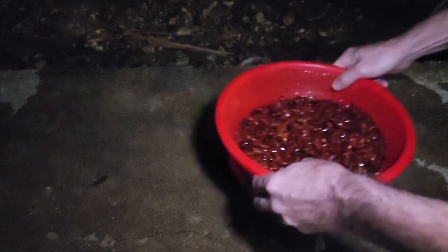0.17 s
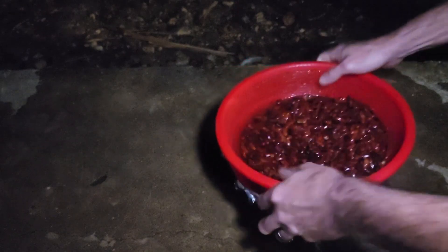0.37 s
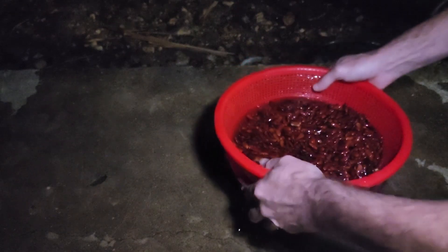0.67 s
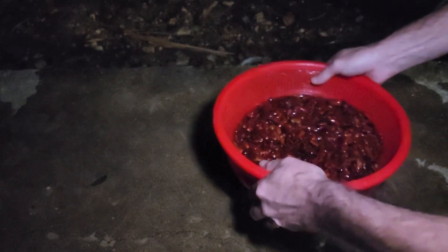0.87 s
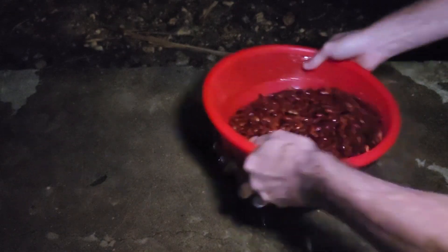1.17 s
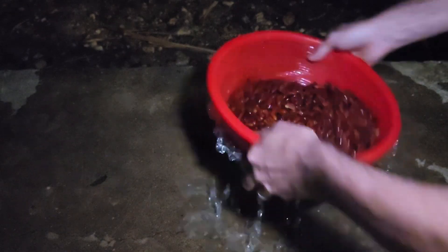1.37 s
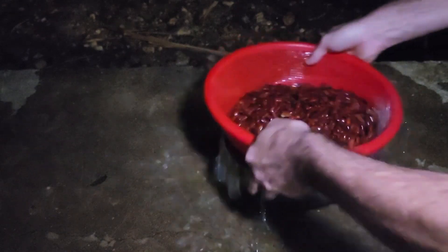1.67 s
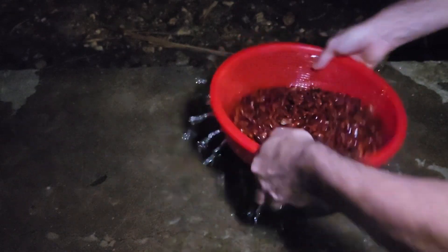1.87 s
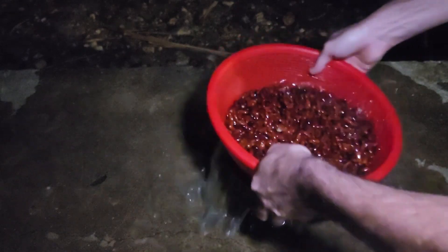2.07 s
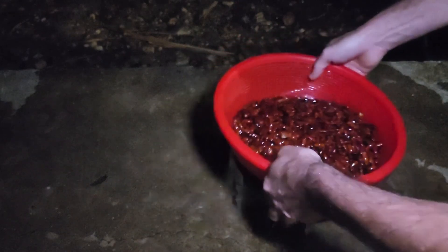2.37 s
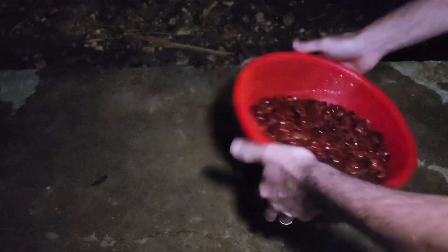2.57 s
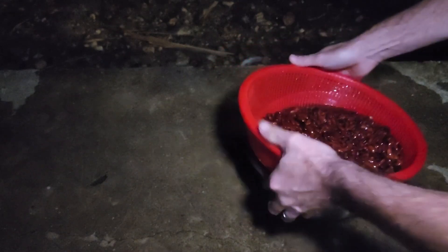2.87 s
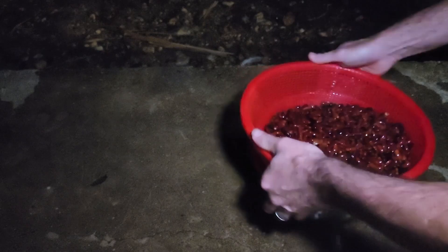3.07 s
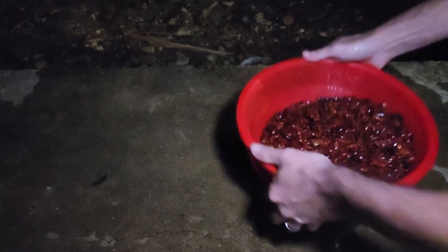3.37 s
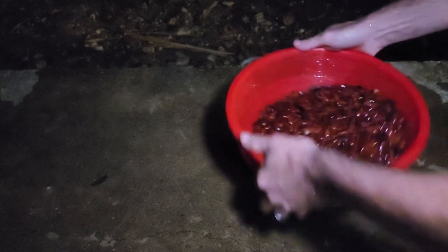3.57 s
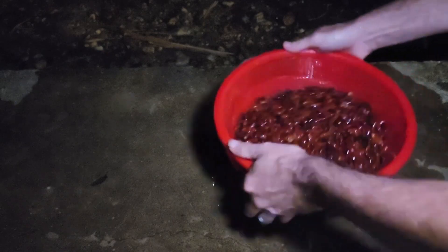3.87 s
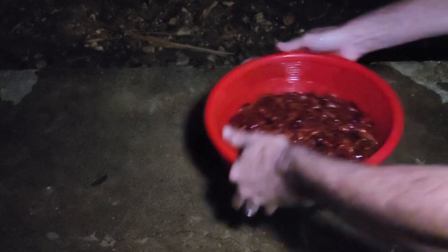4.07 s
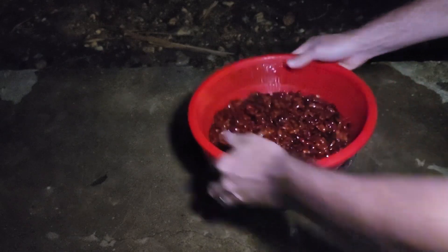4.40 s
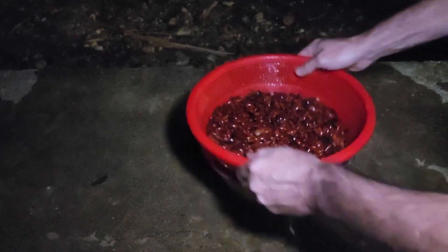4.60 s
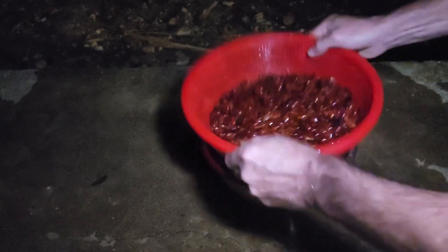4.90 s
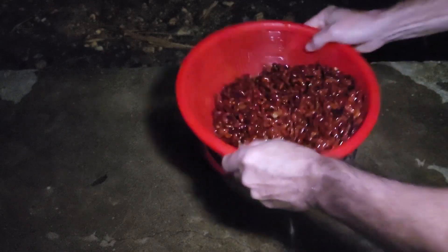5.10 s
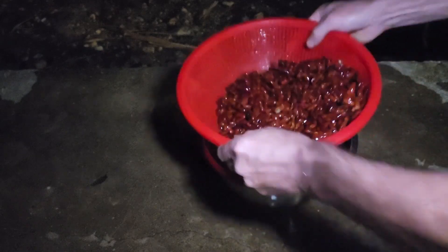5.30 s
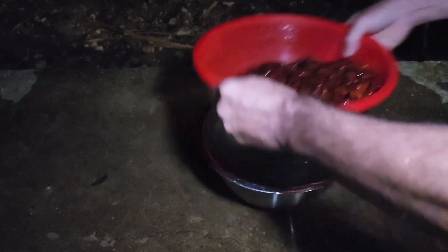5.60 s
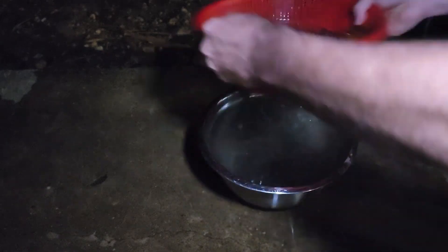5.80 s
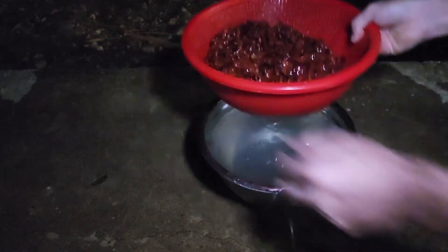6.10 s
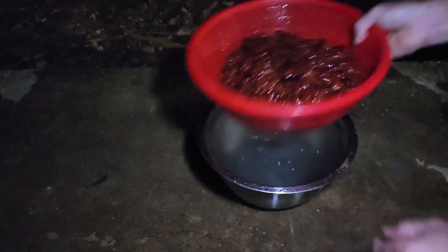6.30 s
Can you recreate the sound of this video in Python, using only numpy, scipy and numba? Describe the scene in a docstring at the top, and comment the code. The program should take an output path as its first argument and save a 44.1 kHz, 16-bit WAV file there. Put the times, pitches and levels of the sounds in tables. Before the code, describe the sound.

Dense clicking beans slide in hollow plastic with crackling water spitting through holes and bubbly slops beneath. Bursts alternate with near-quiet gaps holding only single taps and drips. A steel bowl knocks and rings shortly twice, with dull ground thuds. Heavy dry-ish rattles come late and at the end. Close, mono, short concrete echo, faint night insects, low wind buffeting mostly early.

```python
"""Outdoors at night, near one microphone, hands shake soaked beans in a plastic colander over a bowl of water.
Beans rattle as clouds of short sine grains, water spits through the holes as higher grains, and bubbles
slop in the bowl as grains rising in pitch. Single taps excite a mode of the plastic; thuds are decaying sines.
Knocks ring the damped modes of the steel bowl. Filtered noise makes the far insect hiss, a low hum, the
faint floor and the breeze rumbling on the microphone."""
import sys
import numpy as np
from scipy import signal
from scipy.fft import rfft, irfft
from scipy.io import wavfile
from scipy.ndimage import uniform_filter1d
from numba import njit

SR = 44100
rng = np.random.default_rng(int(sys.argv[2]) if len(sys.argv) > 2 else 0)


def generate_wav(signal):
    """Clip the signal to [-1, 1] and save it as 16-bit WAV at the path in sys.argv[1]."""
    frames = np.transpose(np.atleast_2d(signal))
    scaled = np.clip(frames, -1, 1) * 32767
    pcm = np.round(scaled).astype(np.int16)
    wavfile.write(sys.argv[1], SR, pcm)


N = 284445
STEP = 32  # samples between points of a slow envelope


def undb(db):
    """Logarithmic level: 20 dB is a factor of ten in amplitude."""
    return 10 ** (np.asarray(db) / 20)


def level(x, db):
    """Root-mean-square scaling: x is brought to an rms level in dB."""
    return x * undb(db) / np.sqrt(np.mean(x ** 2))


def decay(t, t60):
    """Exponential decay: the amplitude falls 60 dB in t60 seconds."""
    return np.exp(-np.log(1000) * t / t60)


def colour(x, points):
    """Minimum-phase filtering: a folded cepstrum gives a causal filter whose gain follows (Hz, dB) points."""
    hz, db = np.transpose(points)
    bin_hz = np.arange(1025) * SR / 2048
    gain_db = np.interp(np.log(bin_hz + 1), np.log(hz), db)
    cepstrum = irfft(gain_db * np.log(10) / 20)
    cepstrum[1:1024] *= 2
    cepstrum[1025:] = 0
    impulse = irfft(np.exp(rfft(cepstrum)))[:1024]
    return signal.fftconvolve(x, impulse)[:len(x)]


def walk(rate):
    """Slow random modulation: levels held 1 / rate s and smoothed twice; spread near 1."""
    k = int(SR / rate)
    steps = np.repeat(rng.standard_normal(N // k + 1), k)
    return 1.3 * uniform_filter1d(uniform_filter1d(steps, k), k)[:N]


def ring(x, hz, t60):
    """Modal resonance: one damped mode, a single complex pole, driven by x."""
    pole = np.exp(2j * np.pi * hz / SR - np.log(1000) / (t60 * SR))
    return signal.lfilter([1], [1, -pole], x).imag


@njit
def sprinkle(n, start, turn, fade, glide, size):
    """Superposition: short sine bursts swell for a moment, die away and may rise in pitch."""
    out = np.zeros(n)
    for k in range(len(start)):
        a, w, phase, i = 1., turn[k], 0., start[k]
        while a > .03 and i < n:
            phase += w
            out[i] += size[k] * (a - a * a) * a * np.sin(phase)
            a, w, i = a * fade[k], min(w * glide[k], 3.), i + 1
    return out


def grains(count, lo_hz, hi_hz, cycles, scatter_db, rise, centre=None):
    """Granular synthesis: count grains a second, pitched over lo-hi (times a moving centre), a few much louder."""
    place, pitch, strength = rng.random((int(count * N / SR), 3)).T
    start = (place * N).astype(np.int64)
    f = lo_hz * (hi_hz / lo_hz) ** pitch / SR  # cycles per sample
    if centre is not None:
        f = f * centre[start]
    size = undb(-scatter_db * np.log(strength + 0.015)) * f  # equal energy per Hz before colouring
    fade = np.exp(-f / cycles)
    glide = 1 + rise * f / cycles
    return level(sprinkle(N, start, 2 * np.pi * f, fade, glide, size), 0)


def swells(rows):
    """Energy envelope: power of each event over time, a straight rise in dB, a hold, a straight fall."""
    s, hold, rise, fall, db = np.array(rows)[:, :5].T[:, :, None]
    rise, fall = np.maximum(rise, .004), np.maximum(fall, .004)  # shorter or negative times count as 4 ms
    t = np.arange(0, N, STEP) / SR
    away = np.maximum((s - t) / rise, (t - s - hold) / fall)
    return undb(db - 20 * np.maximum(away, 0)) ** 2 + 1e-30


def per_sample(v):
    """Linear interpolation: an envelope given every STEP samples is filled in to every sample."""
    return np.interp(np.arange(N), STEP * np.arange(len(v)), v)


# spectrum of beans on the plastic colander: pitch_hz [Hz], level_db [dB per Hz]
COLANDER = [(120, -72.5), (200, -7), (469, -11), (745, -6.5), (1160, 1.5), (1440, -2), (2980, -2.5),
            (4650, -10), (6180, -24), (8360, -24), (10200, -77.5), (14000, -41)]
# slides of the bean heap: start_s of the loudest part [s], hold_s [s], rise_s [s per 20 dB],
# fall_s [s per 20 dB], level_db of the rattle before clumping [dB], slop_db above it [dB],
# pitch_hz of the colander's hollow [Hz]
SLIDES = [(0.0, 0.031, .02, .07, -34, -5.5, 1750), (0.166, 0.02, .04, .04, -35.5, -7.5, 1793),
          (0.257, 0.067, -0.15, 0.12, -39, -11.5, 1620), (0.354, 0.024, -0.15, 0.14, -46.5, -11, 1600),
          (.49, 0.096, 0.3, -0.09, -53, -2, 2150), (0.621, 0.031, 0.2, -0.02, -54.5, -4.5, 1980),
          (0.715, .02, 0.2, 0.07, -54, .1, 1690), (0.818, .02, -0.3, 0.27, -56, -6.5, 1546),
          (1.136, .01, 0, -0.1, -60, -4, 1650), (1.195, 0.023, .04, .09, -49.5, -1, 1750),
          (1.306, .04, 0.03, -0.2, -49.5, -1.5, 1750), (1.454, 0.021, 0.1055, 0.12, -34.5, -14.5, 1890),
          (1.549, 0.028, -0.03, 0.6, -41.5, -7.5, 2170), (1.689, .04, -0.02, 0.77, -44, -1.5, 2000),
          (1.752, 0.05, -0.21, 0.38, -42.5, -6, 2620), (1.831, 0.095, 0.0339, 0.2, -34, -7.5, 1900),
          (1.988, 0.15, -0.05, 0.12, -36.5, -5, 2290), (2.169, .03, -0.01, 0.19, -38.5, -3, 1430),
          (2.271, 0.078, -0.26, 0.1152, -38.5, -6.5, 2190), (2.406, .02, -0.25, 0.1362, -37, -5, 1970),
          (2.962, 0.037, 0.0342, .04, -37.5, 1.5, 2910), (3.26, 0.11, 0.2, 0, -68, -3, 2620),
          (3.38, 0.011, 0.01, 0.05, -49.5, 0.5, 2000), (3.57, 0.066, 0.9, 0.6, -69, -9, 2500),
          (3.96, 0.046, 0.1071, 0.21, -40.5, -13.5, 2080), (4.059, 0.041, 0.03, 0.12, -40, -11, 1536),
          (4.165, 0.065, 0.0459, 0.21, -38, -7, 1840), (4.335, 0.039, 0.09, 0.22, -45.5, -2, 2000),
          (4.713, 0.0078, 0.017, 0.0471, -33.5, 1.7, 1610), (4.754, 0.0092, -0.09, .04, -43.5, -6, 1640),
          (4.891, 0.0072, -0.24, 0.2, -51.5, -1, 1170), (5.02, .01, -0.12, -0.14, -44.5, -8, 2180),
          (5.105, 0.033, -0.0049, 0.04, -39.5, -4, 1480), (5.192, 0.0067, 0, -0.06, -47.5, -11, 1390),
          (5.249, 0.028, 0, 0.0333, -31, -20, 1310), (5.291, 0.068, .05, .04, -24, -23, 1676),
          (5.416, 0.041, -0.01, 0.05, -31.5, -10, 1480), (5.517, 0.025, 0.07, 0.0338, -26.5, -12.5, 1833),
          (5.627, 0.027, .03, 0.11, -52, -16, 1220), (5.681, 0.01, -0.03, 0.04, -43.5, -8, 1250),
          (5.863, 0.062, 0.06, 0.05, -47.5, -13.5, 1260), (6.04, 0.029, 0.5, -8.05, -65.5, -23, 1240),
          (6.147, 0.035, 0.01, 0.5, -33.5, -19.5, 1180), (6.218, 0.074, 0.0632, 0.11, -24, -19.5, 1170),
          (6.379, .03, 0.0453, 0, -33, -17, 1130)]


def rattle():
    """Impact noise: many small collisions of beans excite the plastic and the hollow of the colander."""
    power = swells(SLIDES)
    total = power.sum(axis=0)
    beans = grains(count=6000, lo_hz=346.6, hi_hz=14100, cycles=2.1, scatter_db=0.97, rise=0)
    beans = level(colour(beans, COLANDER), -3.32)
    # heavier beans ring the hollow, whose pitch shifts as the heap slides
    hollow_hz = per_sample(np.array(SLIDES)[:, 6] @ power / total)
    hollow = grains(count=600, lo_hz=0.78, hi_hz=1.29, cycles=2.6, scatter_db=1.5, rise=0, centre=hollow_hz)
    hollow = level(hollow, -6.0)
    # lone drops and bean clicks
    drops = grains(count=250, lo_hz=900, hi_hz=6050, cycles=7.3, scatter_db=3.5, rise=0)
    drops = level(colour(drops, COLANDER), -8.5)
    return per_sample(np.sqrt(total)) * (beans + hollow + drops)


# spectrum of spitting water, also of the crack of a tap: pitch_hz [Hz], level_db [dB per Hz]
SPIT = [(1500, -27), (3000, 12), (5000, 8.5), (7800, 7.5), (9500, -3), (12500, -22), (16000, -24)]
# water spitting through the holes: start_s of the loudest part [s], hold_s [s], rise_s [s per 20 dB],
# fall_s [s per 20 dB], level_db before flutter and clumping [dB], fine_db of the finest crackle above it [dB]
SPLASHES = [(0.0, .04, .02, 0.05, -46.5, -17), (.5, 0.089, 0.55, .06, -55.5, -20),
            (0.68, 0.24, 5, 0.7, -63, -16), (1.34, 0.019, 0.16, 0.16, -55, -12.5),
            (1.427, 0.038, -0.03, 0.11, -42, -8), (1.559, 0.024, 0.07, 0.08, -38.5, -13.5),
            (1.746, 0.058, -0.01, -0.01, -40.5, -11), (1.991, 0.074, 0.07, 0.15, -37.5, -15),
            (2.286, 0.03, 0.09, 0.2339, -38.5, -13.5), (2.543, 0.061, 0.4, 0.3, -56.5, -8.5),
            (2.917, 0.064, .007, 0.0853, -41.5, -18.5), (3.872, 0.018, 0.14, .03, -61, -2.5),
            (3.98, 0.014, 0.0239, 0.0747, -36, -11), (4.092, 0.017, 0.07, 0.15, -37.5, -16.5),
            (4.221, 0.042, 0.0936, 0.1743, -39, -13), (4.463, 0.014, 0.31, 0.07, -47, -22),
            (4.513, 0.011, -0.03, 0.01, -41, -7.5), (4.575, 0.0093, -0.05, 0.15, -48.5, -7),
            (5.346, 0.035, 0.13, 0, -45.5, -16), (5.528, 0.035, 0.05, -0.04, -38, -26),
            (6.237, 0.088, 0.08, -0.22, -37.5, -21), (6.373, .07, 0.28, .1, -51, -15.5)]
SPRAY_DB = -21.5  # a little water spits with every slide


def spitting():
    """Droplet noise: water forced through the holes crackles as a dense sum of brief high bursts."""
    power = swells(SPLASHES)
    spit = grains(count=7000, lo_hz=2476, hi_hz=15560, cycles=7.7, scatter_db=3.0, rise=0)
    spit = level(colour(spit, SPIT), -2.3)
    spray = swells(SLIDES).sum(axis=0) * undb(SPRAY_DB) ** 2
    spit = spit * undb(3.84 * walk(70)) * per_sample(np.sqrt(power.sum(axis=0) + spray))
    fine = grains(count=2500, lo_hz=7540, hi_hz=14900, cycles=5.1, scatter_db=4.5, rise=0)
    fine_power = undb(np.array(SPLASHES)[:, 5]) ** 2 @ power
    return spit + fine * per_sample(np.sqrt(fine_power))


# spectrum of water slopping in the bowl: pitch_hz [Hz], level_db [dB per Hz]
SLOP = [(200, -42.5), (330, -23), (450, -4.5), (650, 0), (1000, -10.5), (1800, -25.5), (3000, -32)]


def slopping():
    """Bubble resonance: each bubble in the bowl is a damped sine that rises in pitch as it dies away."""
    slop = grains(count=500, lo_hz=405.5, hi_hz=1730, cycles=4.74, scatter_db=2.0, rise=0.08)
    slop = level(colour(slop, SLOP), -4.5)
    slop_power = undb(np.array(SLIDES)[:, 5]) ** 2 @ swells(SLIDES)
    return slop * per_sample(np.sqrt(slop_power))


def shaking():
    """Common modulation: one random flutter gathers rattle, spitting and slopping into clumps."""
    return undb(1.71 * walk(45)) * (rattle() + spitting() + slopping())


# spectrum of the night floor: pitch_hz [Hz], level_db [dB per Hz]
NIGHT = [(35, -8), (60, -12.5), (85, -9), (172, -11), (732, -12.5), (862, -31), (2900, -33.5),
         (3270, -34.5), (4860, -30.5), (5860, -13), (9790, -39), (12400, -44.5), (16000, -52.5)]
NIGHT_DB = -67.5  # rms


def night_floor():
    """Broadband noise: a faint coloured floor whose level flickers."""
    return level(colour(rng.standard_normal(N), NIGHT) * undb(0.21 * walk(4.4)), NIGHT_DB)


# far insect bands: pitch_hz [Hz], nominal width_hz [Hz], level_db [dB rms]
INSECTS = [(5300, 190, -88), (5670, 360, -74.5), (7480, 340, -80)]


def insects():
    """Narrow-band noise: resonators turn wavering noise into the distant hiss of insects."""
    out = np.zeros(N)
    for hz, width_hz, db in INSECTS:
        wavering = rng.standard_normal(N) * undb(2.0 * walk(3.9))
        out = out + level(ring(wavering, hz, 1.7 / width_hz), db)
    return out


HUM_HZ, HUM_DB = 161, -69  # rms level before it dies away
HUM_HOLDS_S, HUM_FADE_DB_S = .6, 18.5  # fade in dB per second


def hum():
    """Resonant filtering: noise through one low mode gives a far hum, which holds and then dies away."""
    t = np.arange(N) / SR
    fade_db = -HUM_FADE_DB_S * np.maximum(t - HUM_HOLDS_S, 0)
    return level(ring(rng.standard_normal(N), HUM_HZ, 0.092), HUM_DB) * undb(fade_db)


# breeze on the microphone, about which it wavers: start_s [s], level_db [dB]
BREEZE = [(0.0, -36), (0.05, -35), (0.12, -45), (0.47, -41), (0.59, -52), (0.72, -31), (0.83, -48.5),
          (0.92, -29.5), (1.49, -50.5), (1.62, -35.5), (1.74, -54.5), (1.85, -42.5), (2.44, -46.5),
          (3.18, -59.5), (3.43, -40.5), (3.84, -77), (3.93, -62), (4.78, -55), (4.87, -66), (5.44, -51),
          (5.98, -63), (6.45, -65)]
GUSTY_DB, BUFFET_DB = 2, -25  # how much the breeze wavers; its higher flutter against the rumble


def noise_band(lo_hz, hi_hz):
    """Band-pass filtering: white noise confined between two frequencies."""
    sos = signal.butter(3, [lo_hz, hi_hz], "bandpass", fs=SR, output="sos")
    return signal.sosfilt(sos, rng.standard_normal(N))


def breeze():
    """Wind noise: pressure fluctuations at the microphone are low-frequency noise with a wavering level."""
    gusts = level(noise_band(6.0, 18.4), 0) + level(noise_band(25.0, 75.0), BUFFET_DB)
    s, db = np.transpose(BREEZE)
    return gusts * undb(np.interp(np.arange(N) / SR, s, db) + GUSTY_DB * walk(8.1))


# single beans and fingers on the plastic: start_s [s], level_db [dB, nominal peak], pitch_hz of the wall mode [Hz],
# crack_db [dB, relative], t60_s [s, held within 0.01 to 0.3]
TAPS = [(0.097, -40, 2300, 5, 0.065), (0.257, -32.5, 1450, -4, 0.25), (0.349, -20.5, 1546, -33, 0.035),
        (0.473, -30, 2660, -23, 0.13), (0.496, -35, 3370, -17, 0.065), (0.585, -15.5, 2010, 3.5, 0.12),
        (0.708, -35.5, 1870, -25, 0.026), (0.77, -40, 5100, -3, 0.016), (0.902, -40, 3970, -11, 0.028),
        (1.467, -24.5, 1620, -8, 0.094), (1.564, -25, 7000, -1, .04), (1.657, -28, 3030, -27, 0.035),
        (1.748, -24.5, 3570, -3, 0.083), (1.794, -19.5, 1780, 1.5, 0.094), (2.252, -33, 2200, -15, .05),
        (2.292, -26, 2200, -13, 0.045), (2.352, -19, 3110, 6, 0.058), (2.396, -21, 2417, -5, 0.07),
        (2.509, -34, 3150, -13, 0.3), (2.892, -43, 1840, -11, 0.03), (2.944, -27, 2820, -19.5, 0.043),
        (2.966, -34, 3090, -20, 0.099), (3.002, -27, 2600, -6, .03), (3.031, -29, 2500, -2, 0.025),
        (3.106, -44, 1860, -9, 0.14), (3.247, -47, 2270, -25, 0.08), (3.33, -41.5, 3000, -8, 0.06),
        (3.371, -29.5, 4570, -34, 0.032), (3.487, -34.5, 2800, -24, 0.076), (3.572, -48, 2030, -14, 0.034),
        (3.627, -46, 2590, -2, 0.11), (3.773, -46.5, 3790, -15.5, 0.027), (3.978, -23, 3930, 0, 0.063),
        (4.083, -23.5, 1010, 3, 0.077), (4.227, -27, 2930, 9, .04), (4.276, -31, 4270, -8, .04),
        (4.475, -23, 4000, 6, 0.056), (4.512, -20, 1750, 9, 0.17), (4.708, -29, 1580, -34, 0.029),
        (4.899, -34.5, 940, -25, 0.042), (4.92, -39, 1210, 3.5, 0.035), (4.948, -38.5, 2510, 6, 0.1),
        (5.015, -31, 4350, -27, 0.17), (5.106, -42, 2250, -29, 0.05), (5.188, -37, 1230, -28, 0.12),
        (5.559, -28.5, 2400, 9, 0.026), (5.671, -37, 2540, -27, 0.03), (5.722, -39, 1160, -26, 0.055),
        (5.935, -39.5, 1103, -16.5, 0.072), (6.02, -48, 1210, -18, .05), (6.108, -52.5, 1540, -14.5, 0.12)]


def taps():
    """Impact excitation: each tap is a brief wall mode, a bright crack and a rattling tail that starts at the
    mode, or at 2.1 kHz for higher modes."""
    n = 8192
    out = np.zeros(N + n)
    t = np.arange(n) / SR
    onset = 1 - np.exp(-(t / .0022) ** 2)  # the attack is rounded over about 2 ms
    for s, peak_db, hz, crack_db, t60 in TAPS:
        noise = rng.standard_normal((2, n))
        fade = decay(t, np.clip(t60, .01, .3)) * onset
        mode = ring(noise[0] * np.exp(-t / .003) * onset, hz, 40 / hz)
        mode = mode + 0.2 * ring(noise[1] * np.exp(-t / 0.0022) * onset, 2.1 * hz, 40 / hz)
        low = min(hz, 2100)  # the rattle starts no higher than the wall's own body
        above = [(low / 3, -40), (low / 1.4, -18), (low / 1.1, 0),
                 (2.5 * low, -4), (5 * low, -22), (20 * low, -45)]
        tail = level(colour(noise[1], above), -12.5) * fade
        crack = level(colour(noise[0], SPIT), crack_db - 11.5) * (np.exp(-t / 0.0076) + 0.31) * fade
        tap = 0.74 * mode / np.abs(mode).max() + tail + crack
        tap = signal.sosfilt(signal.butter(4, low / 1.25, "highpass", fs=SR, output="sos"), tap)
        i = int(s * SR)
        out[i:i + n] += undb(peak_db) * tap
    return out[:N]


# the bowl bumps the ground: start_s [s], level_db of the envelope at onset [dB], pitch_hz [Hz]
THUDS = [(2.561, -37, 121), (2.968, -33.5, 103), (4.47, -32, 168), (4.712, -36, 130), (5.111, -47, 161)]


def thuds():
    """Heavily damped oscillation: each bump of the bowl on the ground is a low sine that dies at once."""
    n = SR // 2
    out = np.zeros(N + SR)
    t = np.arange(n) / SR
    for s, db, hz in THUDS:
        i = int(s * SR)
        out[i:i + n] += undb(db) * np.sin(2 * np.pi * hz * t) * np.exp(-t / .007)
    return out[:N]


# steel modes before each knock's factors: pitch_hz [Hz], level_db [dB, relative], t60_s [s]
BOWL = [(383.7, -13, 0.8), (535, -8, 0.95), (723, 5.5, 0.053), (765.4, -0.5, 0.56), (914, -16.5, 0.31),
        (1028, -4, 0.63), (1380, -13.5, 0.57), (1680, -17.5, .2), (1832, 2.5, 0.17), (1830, -1, 0.19),
        (2145, -6.5, 0.23), (2290, -5.5, 0.14), (2660, -8.5, 0.12), (3220, -34, .14)]
# crowded weak modes: pitch_hz [Hz], level_db [dB, relative], t60_s [s]
CLANK = [(396, -32, 0.78), (830, -17, 1), (1730, -12.5, 0.75), (2820, 2.5, 0.21), (4030, -22, .14),
         (7000, -45.5, 0.11)]
# knocks on the bowl: start_s [s], level_db [dB, relative], pitch factor of the water fill [ratio],
# scraping contact_s [s], brightness [dB per octave], ring-time factor [ratio], clank_db [dB, relative]
KNOCKS = [(2.563, -24, 1.01, 0.092, 0.9, 0.76, -30.5), (4.472, -40, .975, 0.03, -10, 1.7, -43.5),
          (4.513, -28.5, .975, 0.065, -1, 1.18, -38)]
# moments when a hand stops the ring: start_s [s]
GRIPS_S = 2.92, 4.69


def bowl():
    """Modal vibration: a blow and a short scrape drive steel modes and a dense clank until a hand grips the rim."""
    n = SR // 2
    out = np.zeros(N + SR)
    t = np.arange(n) / SR
    for s, db, fill, contact, tilt_db, longer, clank_db in KNOCKS:
        grip = min(g for g in GRIPS_S if g > s)
        noise = rng.standard_normal((2, n))
        scrape = 0.025 * noise[0] * np.exp(-(t / contact) ** 2)
        push = scrape + np.exp(-t / 0.00025) / 5
        sound = 0
        for hz, g, t60 in BOWL:
            # water sloshing up the wall makes each mode swell and sag
            slosh = undb(3.0 * walk(25)[:n])
            # the hand and water change the ring time less for the high modes
            mode = ring(push, hz * fill, t60 * longer ** min(900 / hz, 1))
            gain = undb(db + g + tilt_db * np.log2(hz / 1000))
            sound = sound + gain * slosh * mode / np.abs(mode).max()
        # thrown up the wall, the water weighs the pitch down at first, then rocks it
        lag = .03 * .025 * (1 - np.exp(-t / .025)) + .004 * np.cumsum(walk(14)[:n]) / SR
        sound = np.interp(t - lag, t, sound) * (1 - np.exp(-(t / 0.0028) ** 2))
        for hz, g, t60 in CLANK:
            band = level(ring(ring(noise[1], hz, 2.5 / hz), hz, 2.5 / hz), clank_db + g)
            fade = decay(np.maximum(t - 0.62 * contact, 0), t60)
            sound = sound + band * fade * (1 - np.exp(-t / 0.008))
        i = int(s * SR)
        out[i:i + n] += sound * np.exp(-np.maximum(t + s - grip, 0) / 0.0027)
    # the small bowl radiates no bass
    return signal.sosfilt(signal.butter(6, 335.0, "highpass", fs=SR, output="sos"), out)[:N]


def echo(close):
    """Reverberation: concrete and walls return a short, bass-poor tail of decaying noise."""
    t = np.arange(SR // 4) / SR
    tail = colour(rng.standard_normal(len(t)), [(250, -17), (600, 3.5), (3000, 0.0), (12000, 2.5)])
    tail = tail * decay(t, 0.082) * (t > .004)
    tail = tail * undb(-12.5) / np.sqrt(np.sum(tail ** 2))
    return signal.fftconvolve(close, tail)[:N]


def scene():
    """Superposition of sound fields: close sources and their echo over the night and the breeze."""
    close = shaking() + taps() + thuds() + bowl()
    night = night_floor() + insects() + hum() + breeze()
    return (close + echo(close) + night)[None]


def record(dry):
    """Band limiting: the recorder cuts the top with a steep low-pass filter."""
    top_hz = 15900
    return signal.sosfilt(signal.ellip(10, .2, 70, top_hz, fs=SR, output="sos"), dry)


dry = scene()
out = record(dry)
generate_wav(out)
```